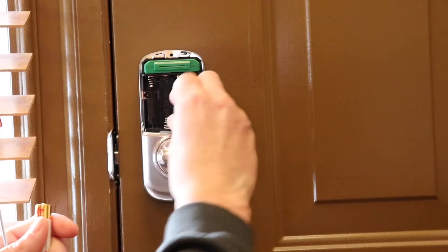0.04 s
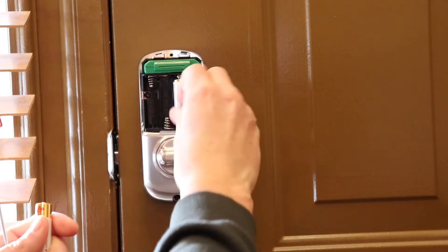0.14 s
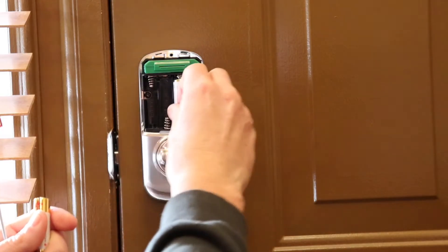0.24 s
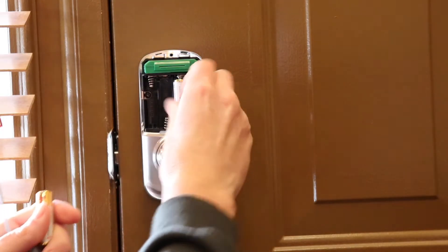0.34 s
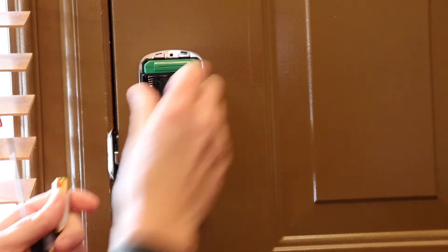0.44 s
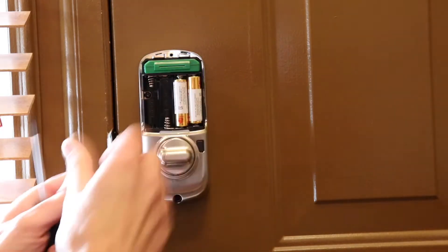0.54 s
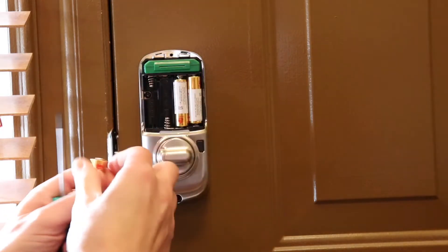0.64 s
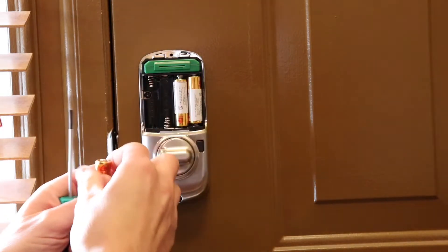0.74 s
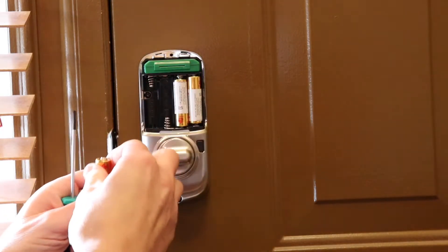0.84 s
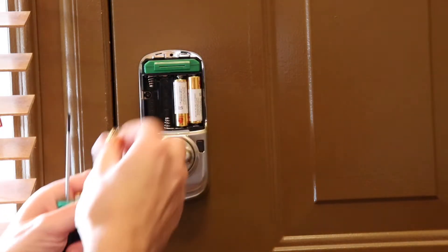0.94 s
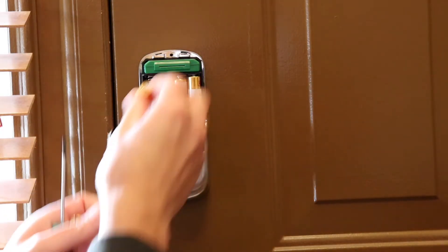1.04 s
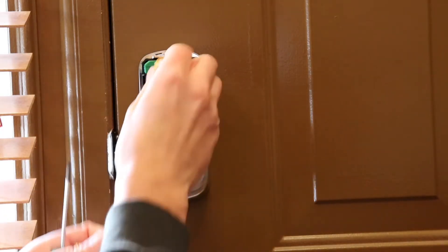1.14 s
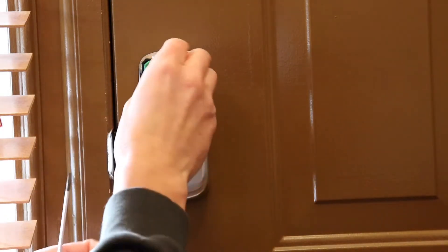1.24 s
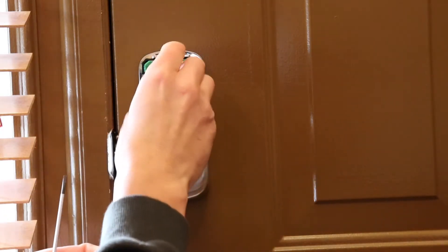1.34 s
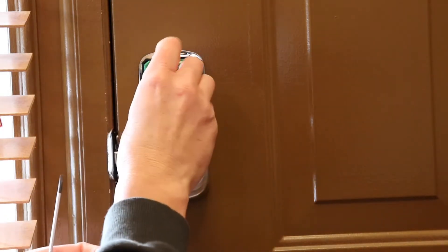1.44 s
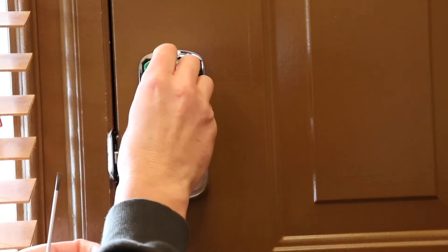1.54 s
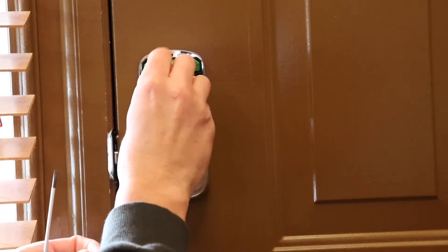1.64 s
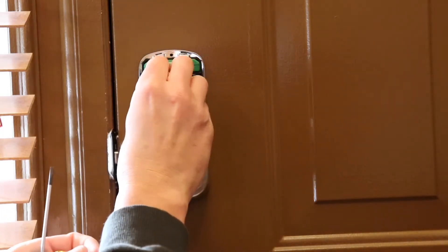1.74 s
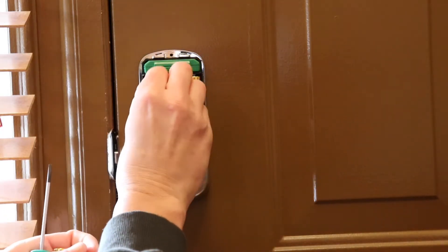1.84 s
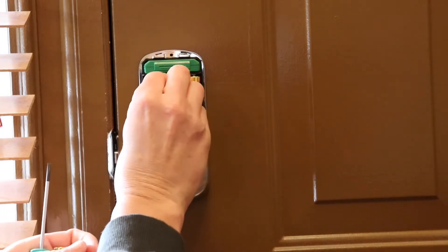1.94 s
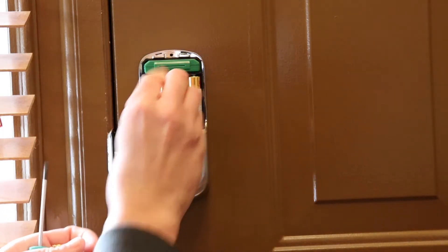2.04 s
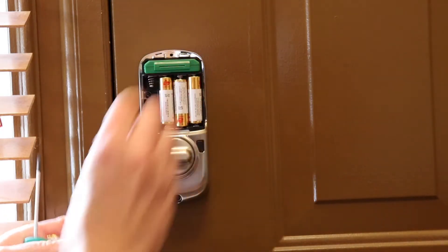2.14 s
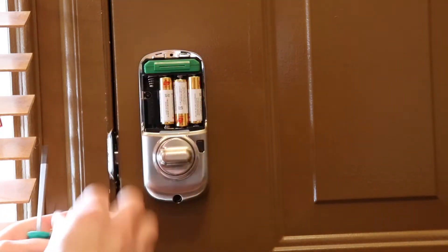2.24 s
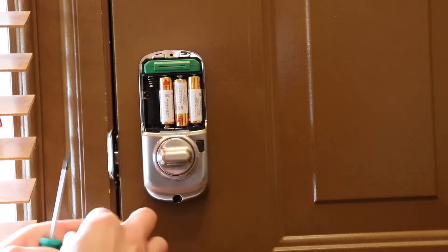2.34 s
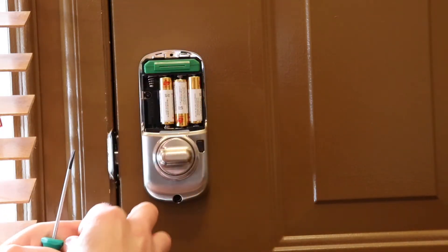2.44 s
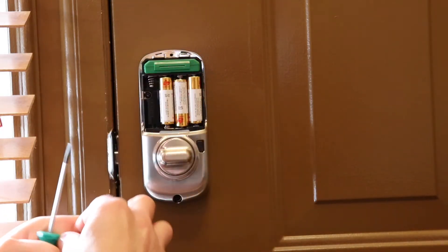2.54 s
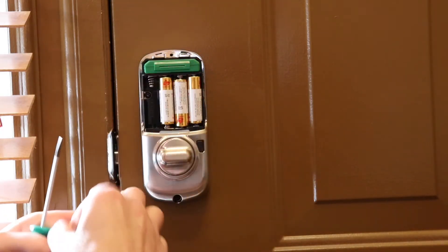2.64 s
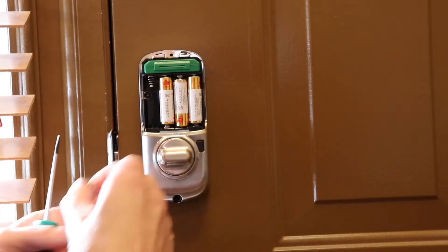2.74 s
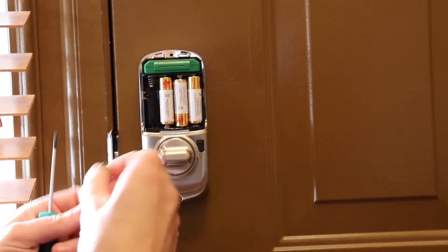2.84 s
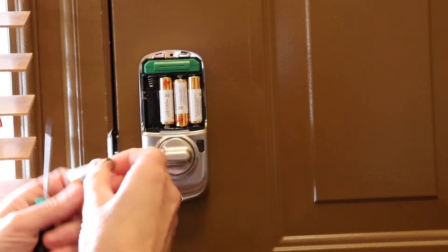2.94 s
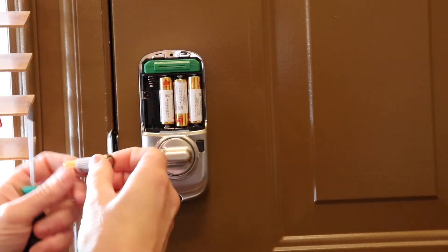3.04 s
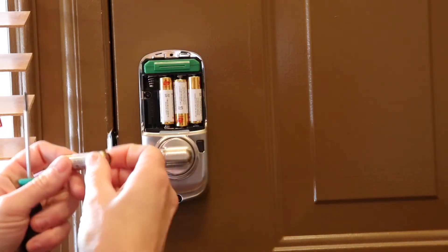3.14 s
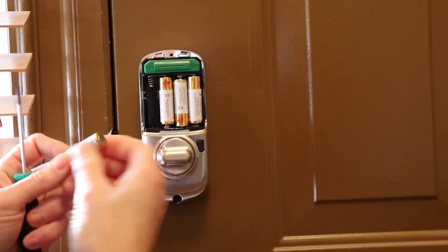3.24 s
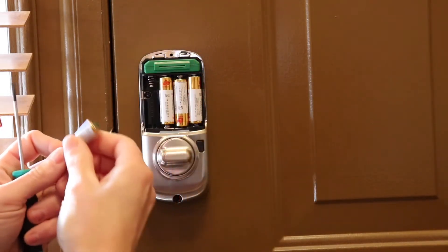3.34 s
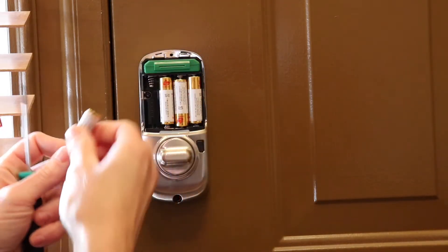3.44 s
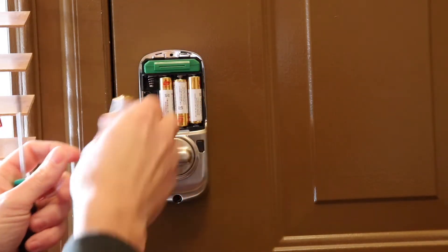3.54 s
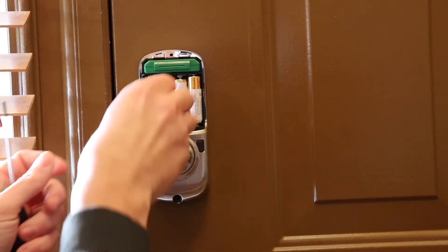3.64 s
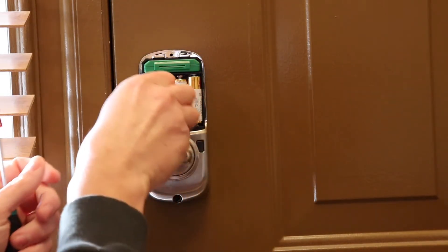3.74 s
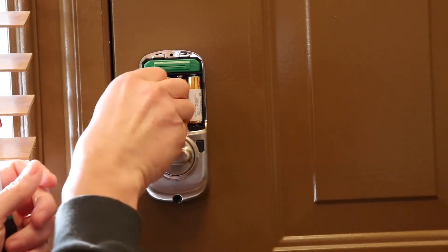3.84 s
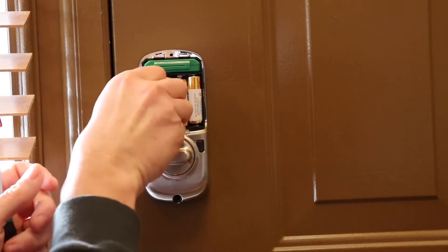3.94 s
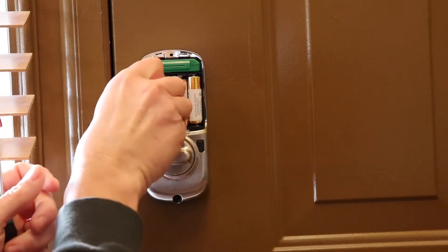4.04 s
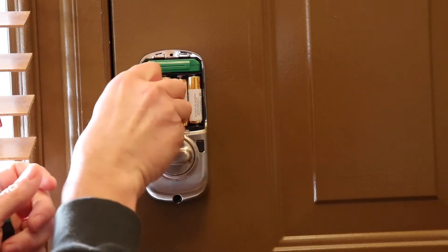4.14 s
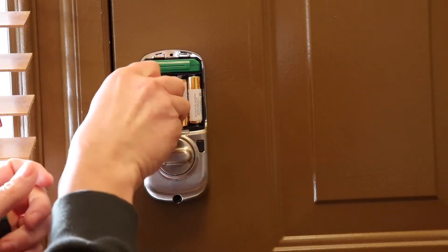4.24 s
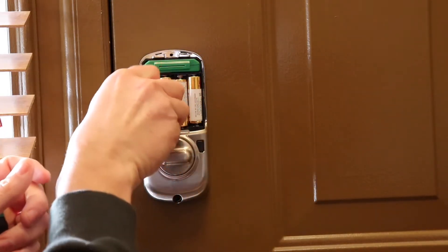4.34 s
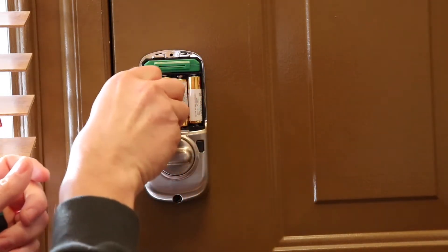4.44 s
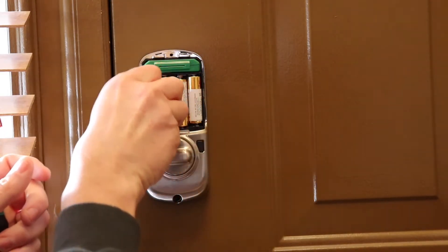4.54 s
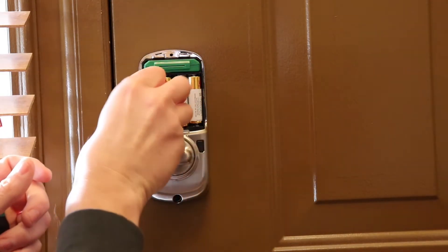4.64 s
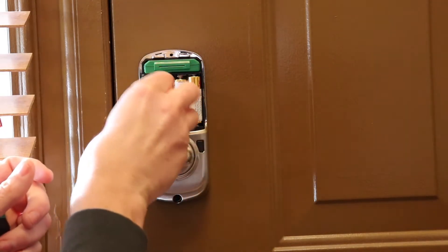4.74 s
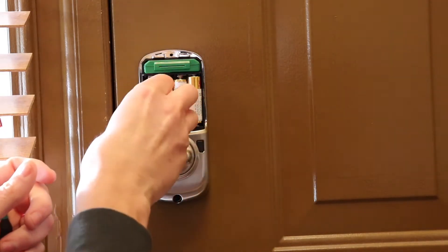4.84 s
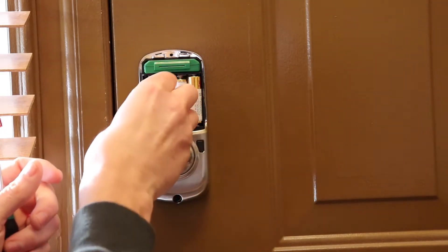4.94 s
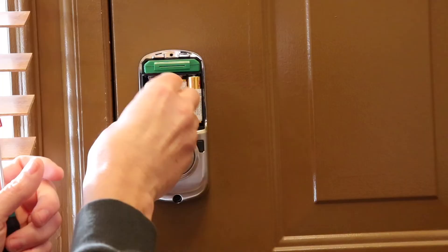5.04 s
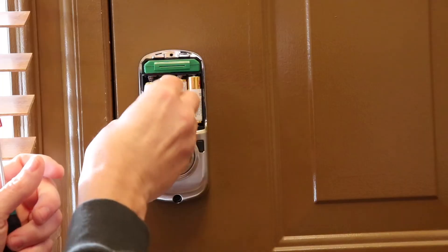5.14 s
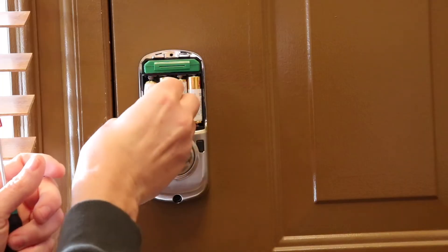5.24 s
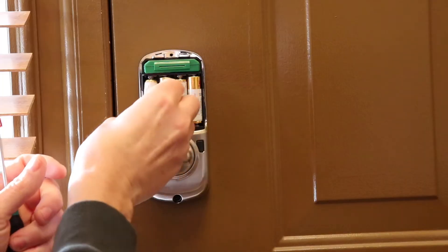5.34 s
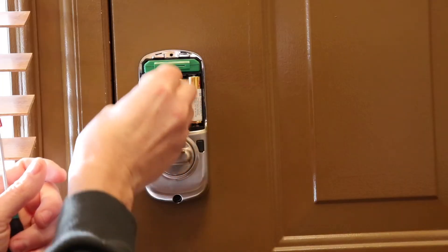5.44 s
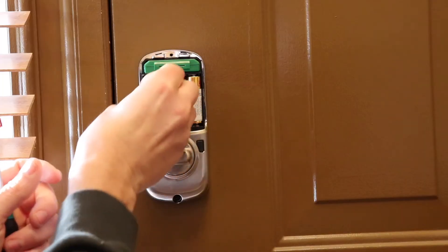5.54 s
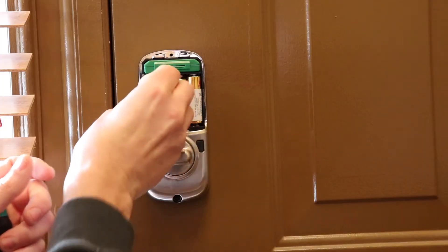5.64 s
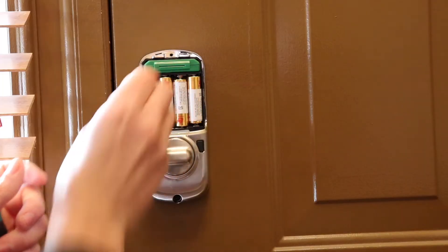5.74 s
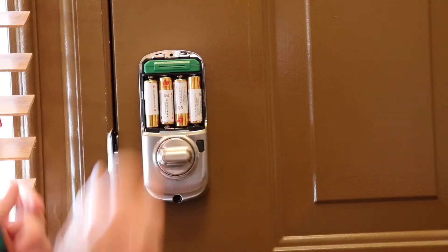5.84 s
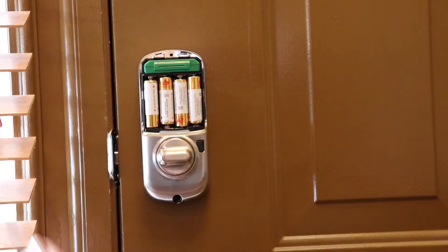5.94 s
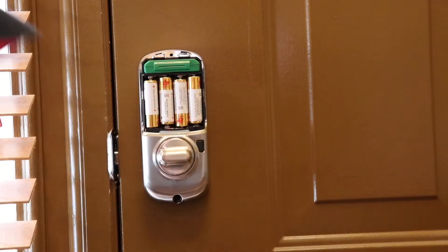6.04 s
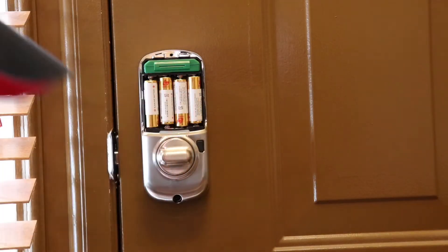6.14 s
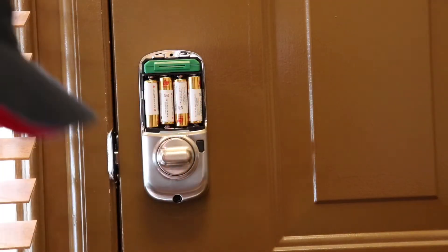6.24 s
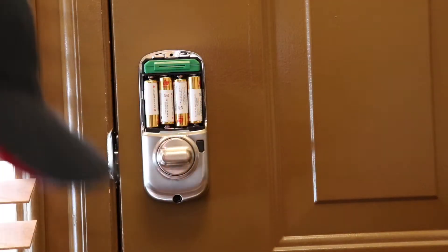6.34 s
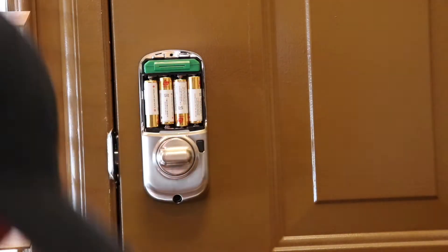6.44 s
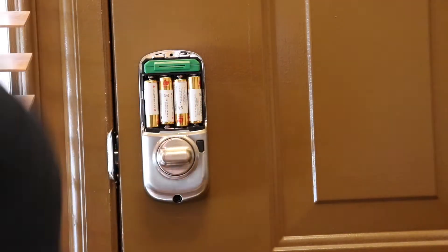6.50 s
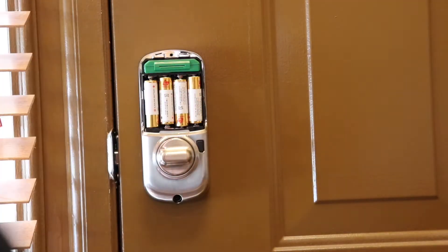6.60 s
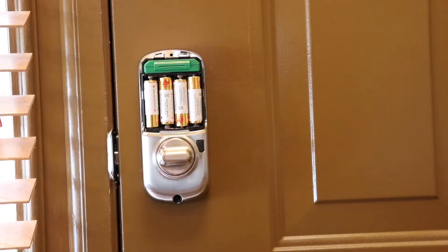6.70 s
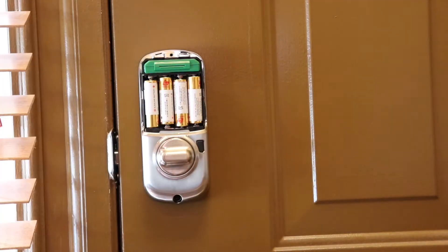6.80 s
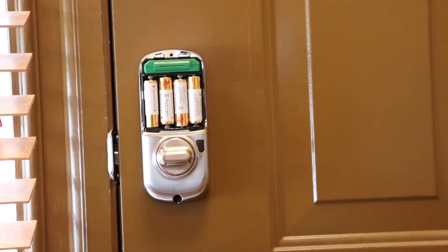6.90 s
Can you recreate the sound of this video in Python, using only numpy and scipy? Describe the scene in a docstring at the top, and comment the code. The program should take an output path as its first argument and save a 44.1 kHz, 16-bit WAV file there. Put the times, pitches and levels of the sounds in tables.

```python
"""In a hard-walled hallway, batteries are pushed one by one into the plastic compartment of a door lock.
Each cell taps the tray, grinds over its spring and snaps home: every touch is a hit plus tiny slips
that make door, casing, cell and spring ring briefly. Hard presses sway the panelled door, and cells
creep along the tray. Fingers rub and a sleeve rustles (shaped noise) over the quiet room's hush.
"""
import sys
import numpy as np
from scipy import signal
from scipy.io import wavfile

SR = 44100
rng = np.random.default_rng(int(sys.argv[2]) if len(sys.argv) > 2 else 0)


def dump_mix(stems):
    """Bounce the given channels to the path in sys.argv[1] as a 16-bit WAV at rate SR."""
    frames = np.atleast_2d(stems).T  # one column per channel
    limited = np.clip(frames, -1, 1)  # hard clip at full scale
    pcm = np.round(limited * 32767).astype(np.int16)
    wavfile.write(sys.argv[1], SR, pcm)


N = 307314
TIME = np.arange(N) / SR   # t/s


def from_db(db):
    """Turn decibels into a plain gain."""
    return 10 ** (np.asarray(db) / 20)


def unit_energy(x):
    """Scale a signal so that its squares sum to one."""
    return x / np.sqrt(np.sum(x ** 2) + 1e-20)


def at_hz(points, hz):
    """Read a table between its points, along a logarithmic frequency axis."""
    points = np.array(points)
    return np.interp(np.log(hz), np.log(points[:, 0]), points[:, 1])


def band(x, low_hz, high_hz, order=2):
    """Keep only the frequencies between two limits."""
    edges = [low_hz, min(high_hz, .47 * SR)]
    return signal.sosfilt(signal.butter(order, edges, "band", fs=SR, output="sos"), x)


def resonate(x, hz, width):
    """Let one resonance ring, with gain one at its top; a wider one (in Hz) dies faster."""
    r = np.exp(-np.pi * width / SR)
    top = np.array([1, 0, -1]) * (1 - r * r) / 2
    return signal.lfilter(top, [1, -2 * r * np.cos(2 * np.pi * hz / SR), r * r], x)


# Limits of the half-octave noise bands: f/Hz
BAND_EDGES = 22 * 2 ** np.arange(0, 10, .5)


def stereo_bands(size, likeness):
    """Yield (f/Hz, stereo noise) per half octave; likeness 1 makes left and right the same."""
    # two noise pairs take turns; the extra quarter second lets the filters settle
    white = rng.standard_normal((2, 2, size + SR // 4))
    for k, (low, high) in enumerate(zip(BAND_EDGES, BAND_EDGES[1:])):
        mid, side = band(white[k % 2], low, high)[:, -size:]
        hz = np.sqrt(low * high)
        alike = np.clip(at_hz(likeness, hz), 0, 1)
        yield hz, np.sqrt((1 + alike) / 2) * mid + np.sqrt((1 - alike) / 2) * side * [[1], [-1]]


def coloured(bands, spectrum):
    """Add up noise bands to a given tone colour; the average of both sides has rms one."""
    out = sum(from_db(at_hz(spectrum, hz)) * noise for hz, noise in bands)
    return out / np.std(out.mean(axis=0))


# Tone colour of the hush: f/Hz, relative level per Hz/dB
HUSH_COLOUR = [(13, -37), (22, -4), (104, -4.5), (137, -9.5), (186, 2), (207, -5.5), (297, -6), (323, -22),
               (450, -5), (628, -8.5), (952, -11), (4020, -17.5), (8260, -21.5), (15200, -29), (16500, -44)]
# How alike left and right are in the hush: f/Hz, likeness (0 to 1)
HUSH_LIKENESS = [(60, 0.59), (150, 0.86), (380, 0.34), (950, 0.32), (2380, 0.082), (5980, 0.05),
                 (15000, 0.08)]


def room_tone(hush_db=-56.5, whine_hz=8230, whine_width=260, whine_db=-71.0):
    """The quiet room: steady noise, plus noise through one narrow resonance as a thin high whine."""
    hush = coloured(stereo_bands(N, HUSH_LIKENESS), HUSH_COLOUR)
    whine = resonate(rng.standard_normal((2, N)), whine_hz, whine_width)
    return from_db(hush_db) * hush + from_db(whine_db) * whine / np.std(whine)


# How long the hallway rings, as the time to fall by 60 dB: f/Hz, t60/s
HALL_T60 = [(60, 0.98), (250, 0.71), (1000, 0.59), (3000, 0.57), (6000, 0.45), (10000, .3), (16000, 0.25)]
# Strength of that ringing: f/Hz, level/dB
HALL_COLOUR = [(60, 1), (140, -0.5), (260, 1), (450, 1), (800, -9.5), (1700, -5.5), (2500, -9),
               (3300, -18.5), (5000, -1.5), (7000, -10.5), (9500, -13.5), (16000, -27.5)]
# How alike left and right are in the hallway, also used for the rustle: f/Hz, likeness (0 to 1)
HALL_LIKENESS = [(150, 1), (400, 0.36), (1000, .25), (3000, 0.25), (12000, .1)]


def hallway(facing, spread, near_db=-11.5, near_s=0.0044, side_db=-8.0, side_s=0.0016,
            build_s=0.004, echo_s=0.069, echo_width_s=0.024, echo_db=4.0):
    """Hand and door frame scatter the sound at once; then the hallway rings, swelling as the far wall answers."""
    t = TIME[:SR]
    near = rng.standard_normal(SR) * np.exp(-t / near_s) * (t > .002)   # silent for the first 2 ms
    near = unit_energy(band(near, 350, 16000))
    side = rng.standard_normal(SR) * np.exp(-t / side_s)
    side = unit_energy(band(side, 350, 17000, order=1))
    early = from_db(near_db) * near + from_db(side_db) * side * [[1], [-1]]
    early[:, 0] += 1   # the direct sound

    echo = from_db(echo_db * np.exp(-((t - echo_s) / echo_width_s) ** 2))
    swell = (1 - np.exp(-t / build_s)) * echo
    late = 0
    for hz, noise in stereo_bands(SR, HALL_LIKENESS):
        fading = unit_energy(swell * from_db(-60 * t / at_hz(HALL_T60, hz)))
        late = late + from_db(at_hz(HALL_COLOUR, hz)) * noise * fading

    direct = signal.fftconvolve(facing[None], early, axes=1)
    ringing = signal.fftconvolve(spread[None], late, axes=1)
    return (direct + ringing)[:, :N]


# Tone colours of the dull and the bright part of the rustle: f/Hz, relative level per Hz/dB
RUSTLE_LOW = [(100, -14), (230, 0), (550, -0.5), (900, -6), (1600, -6), (3000, -59.5)]
RUSTLE_HIGH = [(1000, -38), (2000, 0.5), (3300, -2), (6000, -6), (10000, -11.5), (16000, -23.5)]
# Fingers and sleeve brush past: t/s at the middle, half length/s, relative level/dB,
# brightness/dB (extra level of the bright part)
BRUSHES = [(4.172, .05, -68, 9.5), (4.724, 0.043, -56.5, -2.5), (4.9, 0.044, -77, 9), (6.047, 0.18, -62, 1),
           (6.35, 0.084, -56.5, -6), (6.543, 0.091, -61.5, 0), (6.738, 0.45, -64.5, 3),
           (6.856, 0.012, -68, 16)]


def rustle(low_db=1.0, high_db=0.5):
    """Soft rubbing of fingers and sleeve: noise that swells and fades evenly with each brush."""
    bands = list(stereo_bands(N, HALL_LIKENESS))
    lows = highs = 0
    for s, half_s, db, bright_db in BRUSHES:
        swell = from_db(db) * np.exp(-((TIME - s) / half_s) ** 2)
        lows = lows + swell
        highs = highs + from_db(bright_db) * swell
    dull = from_db(low_db) * lows * coloured(bands, RUSTLE_LOW)
    bright = from_db(high_db) * highs * coloured(bands, RUSTLE_HIGH)
    return dull + bright


def push(grind_ms, t, half_grind_ms=0.89, slip_spread_db=0.0):
    """Force of a contact: one hit, then tiny fading slips; longer grinding gives the slips more energy."""
    slips = rng.standard_normal(len(t)) * from_db(slip_spread_db * rng.standard_normal(len(t)))
    share = grind_ms ** 2 / (grind_ms ** 2 + half_grind_ms ** 2)   # half at half_grind_ms
    force = np.sqrt(share) * unit_energy(slips * np.exp(-1000 * t / grind_ms))
    force[0] += np.sqrt(1 - share)
    return force + 1e-12 * slips   # the trace of noise is inaudible


def part(force, modes, low_hz, high_hz, damping=1.0):
    """A part rings in its main modes, each struck a little differently every time."""
    scatter_db = 9.5
    rings = sum(from_db(db + rng.normal(0, scatter_db)) * resonate(force, hz, width * damping)
                for hz, width, db in modes)
    return unit_energy(band(rings, low_hz, high_hz))


# Lowest modes of the whole door: f/Hz, width/Hz, typical relative level/dB
DOOR_SWAY = [(33, 43, 1), (46, 6.8, -3), (63, 3.4, -4.5)]
# The whole door gives under a hard press: t/s, peak level/dB
SHOVES = [(0.095, -32), (1.802, -40.5), (4.302, -50), (5.353, -29), (5.418, -32.5)]


def shoves(shove_ms=16.0):
    """An uneven press sets the door swaying on its latch, in its lowest modes."""
    out, t = np.zeros(N + SR), TIME[:SR]
    for s, db in SHOVES:
        sway = part(push(shove_ms, t), DOOR_SWAY, low_hz=23.7, high_hz=150.1)
        at = round(s * SR)
        out[at:at + SR] += from_db(db) * sway / np.abs(sway).max()
    return out[:N]


# Main modes of door and casing, also played by batteries(): f/Hz, width/Hz, typical relative level/dB
DOOR_MODES = [(64, 14, -13), (124, 9.8, -8), (151, 18, 2.5), (215, 18, 0.5), (271.6, 24, 2),
              (360, 44, -23.5), (439, 24, -4.5), (481, 60, -25)]
CASING_MODES = [(744, 62, -5), (838, 54, 2.5), (1160, 420, -37.5), (1370, 300, 8), (1505, 38, -18),
                (1740, 400, -24), (2040, 220, 2.5)]
# The hand leans on a cell: t/s of greatest pressure, easing time/s, relative level/dB
PRESSES = [(0.1, 0.031, -33), (0.36, .05, -58), (1.66, .05, -44), (1.81, 0.02, -46.5), (3.77, .03, -51.5),
           (4.315, .04, -49), (4.43, .025, -58.5), (4.56, .08, -59.5), (5.04, .04, -55), (5.122, .04, -56),
           (5.195, 0.022, -48), (5.25, .09, -51.5), (5.33, .03, -55.5), (5.42, 0.095, -42),
           (5.66, .08, -49)]


def creeping(rise_s=0.02, sway_db=1.0, door_db=-1.0, casing_db=-3.5, slip_spread_db=4.5):
    """A pressed cell creeps along the tray in countless tiny slips: the door rumbles, the casing rasps."""
    pressure = 0
    for s, ease_s, db in PRESSES:
        distance = np.maximum((s - TIME) / rise_s, (TIME - s) / ease_s)
        pressure = pressure + from_db(db) * np.exp(-distance)
    slips = rng.standard_normal(N) * from_db(slip_spread_db * rng.standard_normal(N))
    rings = (from_db(sway_db) * part(slips, DOOR_SWAY, low_hz=24, high_hz=150)
             + from_db(door_db) * part(slips, DOOR_MODES, low_hz=50, high_hz=620)
             + from_db(casing_db) * part(slips, CASING_MODES, low_hz=450, high_hz=970))
    return pressure * rings * np.sqrt(N)   # unit energy to unit rms


# A cell that is left free rings on: t/s, f/Hz, starting level/dB, t60/s
PINGS = [(1.588, 1497, -44.5, 0.46), (4.525, 3365, -38, 0.21)]


def pings():
    """Thin metallic after-ring of a cell that the fingers do not damp: a fading sine."""
    out = np.zeros(N)
    for s, hz, db, t60 in PINGS:
        t = np.maximum(TIME - s, 0)
        out += from_db(db - 60 * t / t60) * np.sin(2 * np.pi * hz * t)
    return out


# Contacts, all as: t/s, relative level/dB, hardness/dB, favoured f/Hz of the touched part, grinding time/ms
# A cell knocks on the casing
KNOCKS = [(0.084, -27, 2, 850, 1.24), (0.11, -29.5, 13, 1980, 2.1), (0.1149, -30.5, 10, 676, 2.7),
          (1.589, -35, 0, 1470, 1.3), (1.67, -42, 9, 1455, 5.6), (1.794, -36, 5, 870, 3.3),
          (1.815, -27, -1, 907, 2.2), (3.751, -54, -6, 860, 3.7), (3.88, -48, -4, 720, 3),
          (3.902, -40.5, 0, 850, 1.2), (4.0855, -36, -15, 780, 3.3), (4.4075, -36.5, -12.5, 2220, 1.4),
          (5.334, -50, 2, 820, 4), (5.3555, -36, 6.5, 760, 5.2), (5.375, -27.5, 0, 760, 1.1),
          (5.412, -27, 7.5, 753, 2.4)]
# A cell's end drops into its seat (the cell itself is the touched part)
SEATINGS = [(0.077, -23, -9, 2910, 3.3), (0.0797, -19.5, 2, 3000, 1.34), (1.488, -54.5, 4.5, 3520, 12),
            (1.7931, -33.5, -7, 3400, 0.62), (1.8134, -16.5, 0, 3560, 0.5), (4.4073, -34, -8, 2850, 0.81),
            (4.532, -40, 6, 3500, 4.6), (4.66, -52.5, -3, 3370, 12), (5.356, -37, -2.5, 3380, 2),
            (5.3695, -30.5, -0.5, 3300, 1.44), (5.4065, -11.5, 2.5, 2900, 0.4)]
# A cell slips over its spring
SLIPS = [(0.1232, -24, -3.5, 4300, 0.4), (1.6548, -36.5, -5, 3900, 3.9), (1.711, -51.5, -6, 4330, 7),
         (1.807, -38.5, -2, 4500, 3), (3.94, -52, -4.5, 7200, 3.8), (4.29, -25.5, 3.5, 6600, 1.7),
         (4.2918, -31, 5.5, 4700, 2.8), (4.49, -49, -5, 7150, 5), (4.524, -42.5, 4, 7600, 6.2),
         (5.349, -38.5, -10.5, 5300, 5), (5.3926, -31, 10, 6700, 0.46)]
# How each kind shares its energy: level/dB of door, casing, cell, spring, crack (before hardness)
KNOCK_SHARE = (-9, 0, -10, -19, -35)
SEATING_SHARE = (-18, -8, 0, -8, -25)
SLIP_SHARE = (-19, -12, 0.5, 2.5, -11)


def contacts(casing_hz=1812, cell_hz=3280, spring_hz=4597, grip_spread=.025, crack_per_hardness=1.4):
    """Yield each touch as (t/s, five levels/dB, three pitches/Hz, grinding/ms); hard ones excite more treble."""
    kinds = [(KNOCKS, KNOCK_SHARE), (SEATINGS, SEATING_SHARE), (SLIPS, SLIP_SHARE)]
    hardness_effect = np.array([0, 0, 0, 1, crack_per_hardness])   # only spring and crack
    for touched, (rows, share_db) in enumerate(kinds):
        for s, db, hardness_db, hz, grind_ms in rows:
            levels_db = db + np.array(share_db) + hardness_db * hardness_effect
            # the grip shifts the untouched parts a little
            grip = 1 + grip_spread * rng.standard_normal(size=3)
            pitches = np.array([casing_hz, cell_hz, spring_hz]) * grip
            pitches[touched] = hz
            yield s, levels_db, pitches, grind_ms


def clamping(grind_ms):
    """A cell that snaps straight home is held at once: its modes die up to five times faster."""
    return min(1 + (.45 / grind_ms) ** 4, 5)


def favour(ring, hz, width, lift_db):
    """The place of the touch and the grip bring out one pitch."""
    return unit_energy(ring + from_db(lift_db) * resonate(ring, hz, width))


def crowd(force, low_hz, high_hz, t60):
    """Between the main modes lie many weak ones: together a brief noisy ring."""
    t = TIME[:len(force)]
    ring = rng.standard_normal(len(t)) * from_db(-60 * t / t60)
    return unit_energy(band(signal.fftconvolve(force, ring)[:len(t)], low_hz, high_hz))


# Main modes of cell, spring and the crack on top: f/Hz, width/Hz (before clamping), typical relative level/dB
CELL_MODES = [(3020, 180, 13), (3234, 300, 7.5), (3520, 380, -5), (3573, 710, -3)]
SPRING_MODES = [(4100, 500, -15), (4590, 590, 1), (5640, 1000, 4.5), (6400, 760, -6.5), (6700, 550, 17),
                (7830, 600, -10)]
CRACK_MODES = [(8800, 810, -11.5), (9920, 420, 4), (11300, 920, -10.5), (13270, 3700, -1),
               (15200, 4400, -11)]
# Weak, crowded modes of door, casing, cell, spring and crack, in that order: lowest f/Hz, highest f/Hz, t60/s
CROWDS = [(145, 550, 0.067), (590, 1430, 0.05), (2690, 3580, 0.0024), (3900, 14000, 0.02),
          (7800, 18000, 0.015)]


def batteries(near_crowd_db=-7.0, far_modes_db=-4.5, far_crowd_db=-1.0):
    """Each touch drives all parts at once: one mix faces the listener, an evener one spreads into the hallway."""
    out, t = np.zeros((2, N + SR)), TIME[:SR // 3]
    for s, levels_db, (casing_hz, cell_hz, spring_hz), grind_ms in contacts():
        force, damping = push(grind_ms, t), clamping(grind_ms)
        door = part(force, DOOR_MODES, low_hz=50, high_hz=574)
        casing = part(force, CASING_MODES, low_hz=566, high_hz=2420)
        casing = favour(casing, casing_hz, width=110, lift_db=14.5)
        cell = part(force, CELL_MODES, low_hz=2670, high_hz=4430, damping=damping)
        cell = favour(cell, cell_hz, width=220 * damping, lift_db=31.0)
        spring = part(force, SPRING_MODES, low_hz=3700, high_hz=8350, damping=damping)
        spring = favour(spring, spring_hz, width=600 * damping, lift_db=17.0)
        crack = part(force, CRACK_MODES, low_hz=7900, high_hz=16500)
        main = np.array([door, casing, cell, spring, crack])
        weak = np.array([crowd(force, *row) for row in CROWDS])
        # each part is also shoved bodily: a toneless knock that spreads in all directions
        knock = np.array([unit_energy(band(force, low_hz, high_hz)) for low_hz, high_hz, _ in CROWDS])

        facing = main + from_db(near_crowd_db) / damping * weak
        spread = knock + from_db(far_modes_db) * main + from_db(far_crowd_db) * weak
        gains = np.sqrt(SR / 100) * from_db(levels_db)   # levels count as rms over 10 ms
        at = round(s * SR)
        for way, blend in enumerate([facing, spread]):
            rings = np.array([unit_energy(ring) for ring in blend])
            out[way, at:at + len(t)] += gains @ rings
    return out[:, :N]


def scene():
    """Clicks and thuds in the hallway, over rustle and room tone."""
    background = rustle() + room_tone()
    creep = creeping()
    facing, spread = batteries()
    facing = facing + creep + pings() + shoves()
    spread = spread + from_db(-8.5) * creep
    return hallway(facing, spread) + background


def record(dry, ceiling=.96, cutoff_hz=16300):
    """Round off the loudest peaks below a ceiling, then cut the top of the treble."""
    clipped = dry / (1 + (dry / ceiling) ** 8) ** (1 / 8)
    return signal.sosfilt(signal.ellip(10, .2, 80, cutoff_hz, fs=SR, output="sos"), clipped)


dry = scene()
out = record(dry)
dump_mix(out)
```